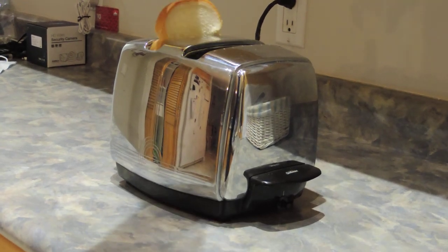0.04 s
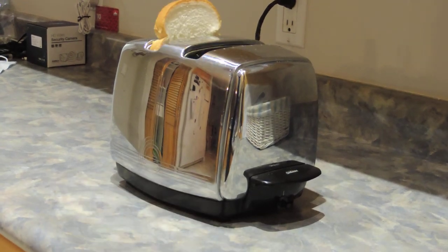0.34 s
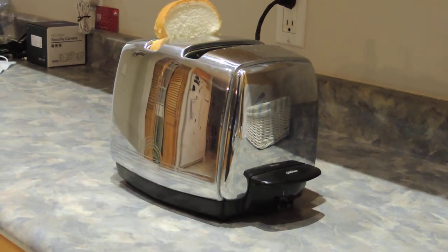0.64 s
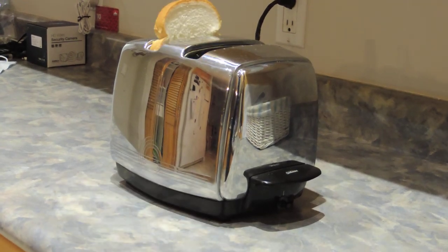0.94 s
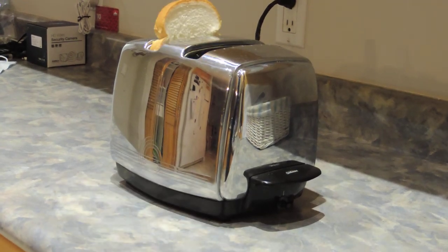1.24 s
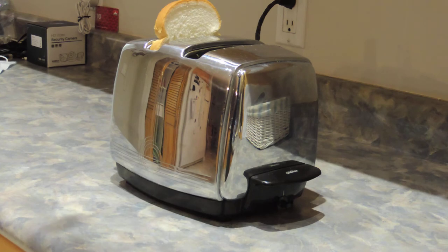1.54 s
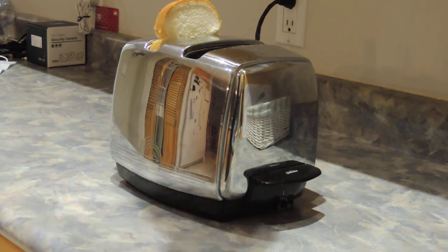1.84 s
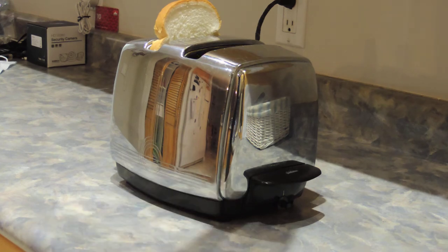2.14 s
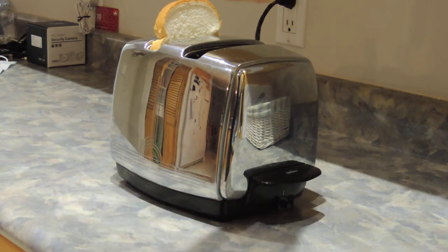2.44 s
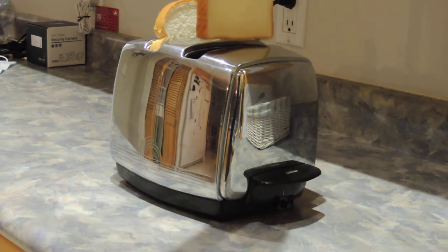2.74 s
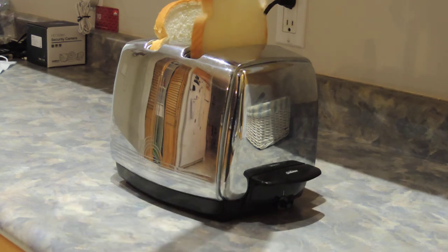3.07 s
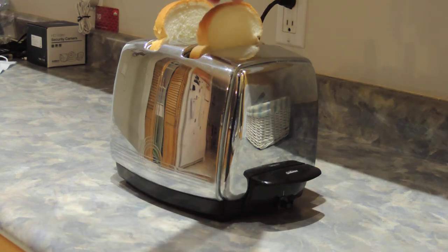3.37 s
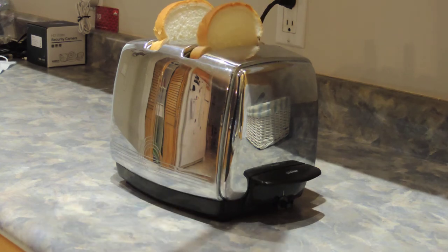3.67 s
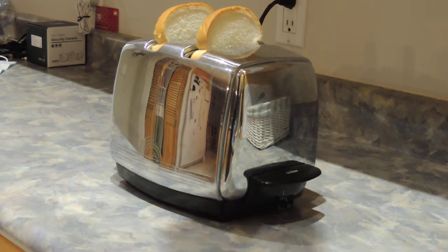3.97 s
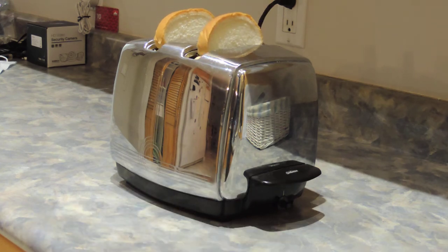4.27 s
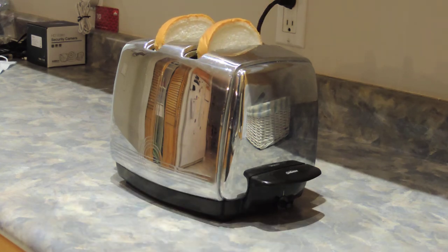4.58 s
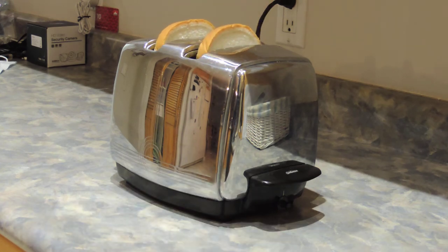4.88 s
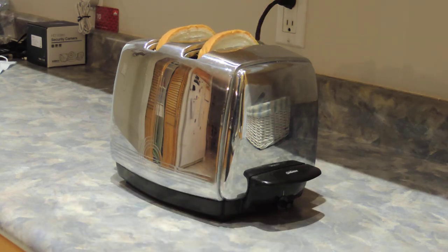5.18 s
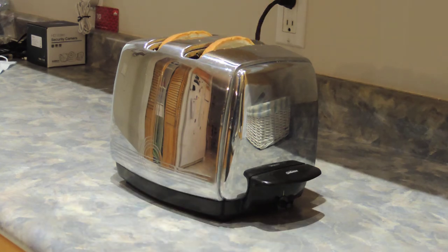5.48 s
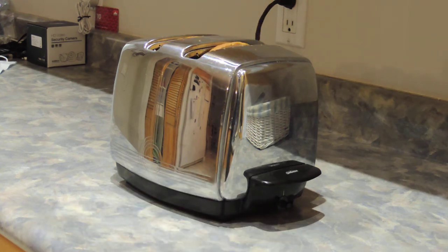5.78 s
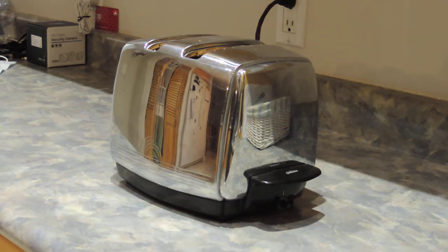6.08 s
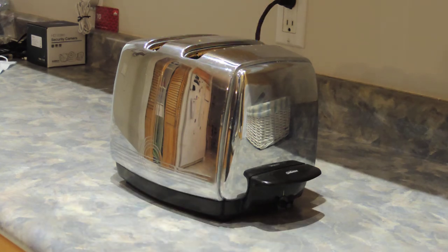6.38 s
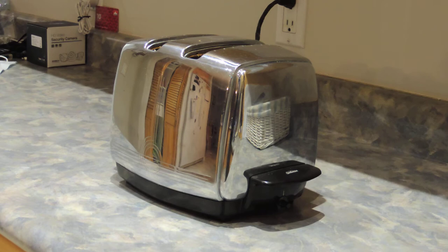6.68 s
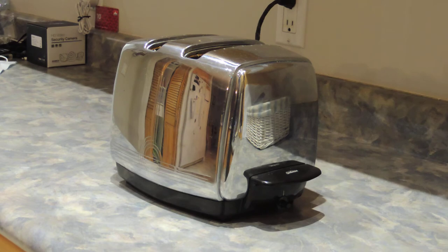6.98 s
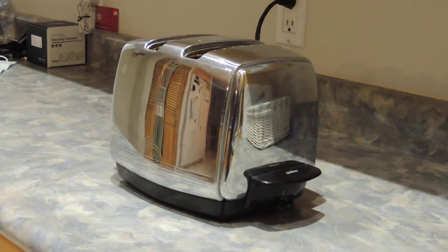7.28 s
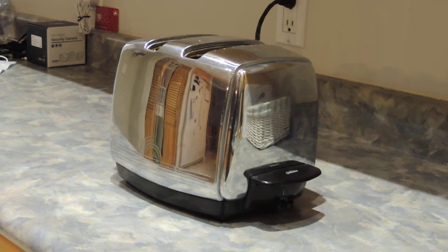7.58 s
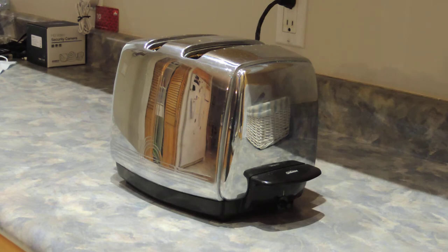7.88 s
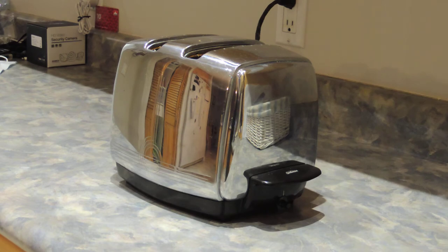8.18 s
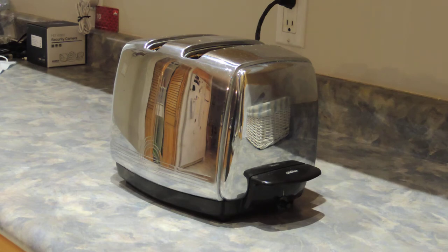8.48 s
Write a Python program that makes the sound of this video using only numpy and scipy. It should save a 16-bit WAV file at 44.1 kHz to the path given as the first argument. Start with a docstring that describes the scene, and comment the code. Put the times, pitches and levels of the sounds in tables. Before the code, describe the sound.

Over a low fridge hum, a steel toaster clatters as bread lands, then clacks and lowers the slices with faint scraping.

```python
"""In a small kitchen, bread drops into a steel toaster that lowers itself. It plucks the guide wires
and rattles the carriage, the rack that holds it; each knock makes the wires and the shell ring.
A catch clacks, then the slices sink, their crusts rubbing softly along the slots.
Behind it all are a refrigerator's throbbing hum and a faint hiss."""
import sys
import numpy as np
from scipy import signal
from scipy.fft import rfft, irfft, next_fast_len
from scipy.io import wavfile
from scipy.ndimage import map_coordinates

SR = 44100
rng = np.random.default_rng(int(sys.argv[2]) if len(sys.argv) > 2 else 0)


def master_out(mix):
    """Clip the mix to full scale and print it as 16-bit PCM to the path in sys.argv[1]."""
    frames = np.transpose(np.atleast_2d(mix))
    ceiling = np.clip(frames, -1, 1)
    pcm = np.round(ceiling * 32767).astype(np.int16)
    wavfile.write(sys.argv[1], SR, pcm)


N = 380141
TIME = np.arange(N) / SR
TAIL = np.arange(SR // 2) / SR  # the half second after a knock


def amp(db):
    """Turn decibels into a gain."""
    return 10 ** (np.asarray(db) / 20)


def unit(x):
    """Scale a signal to an average power of 1."""
    return x / np.sqrt(np.mean(x ** 2) + 1e-20)


def along(points, hz):
    """Read between (Hz, value) points on a logarithmic pitch scale."""
    pitches, values = np.transpose(points)
    return np.interp(np.log(hz + 1), np.log(pitches + 1), values)


def wobble(rate):
    """A smooth curve through `rate` random values a second."""
    return map_coordinates(rng.standard_normal(int(N * rate / SR) + 4), [TIME * rate])


def filtered(x, response):
    """Give each frequency in x the gain that response(hz) asks for."""
    length = x.shape[-1]
    padded = next_fast_len(length + 8192)
    hz = np.fft.rfftfreq(padded, 1 / SR)
    return irfft(rfft(x, padded) * response(hz), padded)[..., :length]


def resonances(peaks, hz):
    """The response of ringing peaks, each given as pitch in Hz, width in Hz, level in dB."""
    return sum(amp(db) * 1j * hz * width / (pitch ** 2 - hz ** 2 + 1j * hz * width)
               for pitch, width, db in peaks)


def noise(response, alike, size):
    """Shaped stereo noise; `alike` pairs Hz with how alike left and right are (1 is the same)."""
    def mid_and_side(hz):
        angle = np.arccos(np.clip(along(alike, hz), -1, 1)) / 2
        return response(hz) * np.array([np.cos(angle), np.sin(angle)])
    mid, side = filtered(rng.standard_normal((2, size)), mid_and_side)
    return unit(np.array([mid + side, mid - side]))


def add(track, start, sound):
    """Mix a short sound in at `start` seconds."""
    part = track[:, round(start * SR):][:, :len(TAIL)]
    part += sound[:, :part.shape[1]]


def refrigerator():
    """The compressor's turning shaft varies the mains buzz; tones close in pitch beat and throb."""
    # Each row: multiple of the mains buzz, multiple of the shaft speed, level in dB.
    compressor = [(0, 1, -38.5), (0, 2, -60), (1, 0, -55), (0, 3, -62.5), (1, 1, -59), (1, 2, -58.5),
                  (3, -3, -68), (0, 5, -68.5), (2, 0, -62), (1, 3, -67.5), (3, -2, -62), (0, 6, -63.5),
                  (2, 1, -57), (3, -1, -60), (0, 7, -58.5), (2, 2, -51), (3, 0, -63), (2, 3, -63),
                  (4, 0, -67.5), (3, 3, -64.5)]
    # Each row: pitch in Hz, level in dB.
    fan = [(58.9, -60.5), (588.8, -67.5), (714.8, -68)]
    shaft_hz, buzz_hz = 46.36, 120
    turns = shaft_hz * TIME + 0.02 * wobble(0.715)
    tones = [(buzz * buzz_hz * TIME + shaft * turns, db) for buzz, shaft, db in compressor]
    tones += [(hz * TIME + 0.12 * wobble(3), db) for hz, db in fan]
    hum = sum(amp(db + 0.33 * wobble(3.24)) * np.sin(2 * np.pi * (cycles + rng.random()))
              for cycles, db in tones)
    return hum * amp([[.1], [-.1]])  # left, right


def room_tone():
    """A low rush of air and a hiss with a few thin whines."""
    # Each row: frequency in Hz, relative level in dB.
    air_tone = [(10, 0.5), (28, -2), (70, -6.5), (110, -13), (150, -2.5), (190, -10), (300, -3),
                (420, -9.5), (600, -15.5), (1000, -17), (2200, -23.5), (4500, -24.5), (9000, -26.5),
                (14200, -28)]
    # The whines. Each row: pitch in Hz, width in Hz, relative level in dB.
    peaks = [(1904, 174, -1), (2765, 116, 0), (5480, 26, 2), (5790, 44, 2.5), (6360, 43, 2.5)]
    # Each row: frequency in Hz, how alike left and right are.
    alike = [(60, 0.77), (130, 0.89), (290, 0.97), (640, 0.56), (1400, 0.18), (3070, -0.089),
             (6750, -0.016), (14800, -0.026)]
    air = noise(lambda hz: amp(along(air_tone, hz)), alike, N)
    whine_tone = lambda hz: np.sqrt(sum(abs(resonances([peak], hz)) ** 2 for peak in peaks))
    return amp(-49) * air + amp(-63) * noise(whine_tone, alike, N)


def contacts():
    """List each blow and any bounces of the loose carriage: time, then click, clank and thud levels."""
    # Bread lands near 3.4 s, the catch lets go near 4.4 s, then the carriage knocks on its way down.
    # Each row: start in seconds, click, clank and thud levels in dB, seconds allowed for bouncing.
    blows = [(.002, -56, -60, -51, 0.0078), (.955, -54, -70, -63, 0.018), (3.200, -44.5, -53, -68, 0),
             (3.210, -44, -46.5, -55, 0.0024), (3.268, -45.5, -52, -50, 0),
             (3.406, -34.5, -37, -50, 0.0011), (3.412, -32, -35, -55, 0.0028),
             (3.429, -28.5, -33.5, -48, 0.00062), (3.440, -32, -31.5, -38.5, .2), (3.558, -44, -57, -63, 0),
             (3.809, -69, -51, -57, 0.011), (4.372, -35, -44, -44.5, 0), (4.376, -45, -42, -44, 0.065),
             (6.478, -48.5, -50.5, -51.5, 0.063), (7.080, -57, -53.5, -59, 0.015),
             (7.560, -54, -53, -56, 0.0049)]
    # Bounces start weaker than their blow: click, clank and thud in dB.
    bounce_db = [-8, -10.5, -2.5]
    # They grow softer and duller: click, clank and thud in dB per second.
    fade_rates = [-90, -63, -55]
    gap_s, unevenness = .0205, .15
    for start, *levels, rattle_s in blows:
        yield start, *levels
        for delay in np.arange(gap_s, rattle_s, gap_s):
            bounce = np.add(levels, bounce_db) + delay * np.array(fade_rates)
            yield start + delay + gap_s * unevenness * rng.standard_normal(), *bounce


def ripple(spacing_hz, depth_db):
    """Metal favours some pitches over others: random hills and valleys as (Hz, dB) points."""
    hz = np.arange(0, SR / 2, spacing_hz)
    return np.transpose([hz, depth_db * rng.standard_normal(len(hz))])


def ring(tones, scatter_db, waver_db):
    """Struck metal rings with a new balance of tones each time; loose parts make them waver."""
    hz, db, fade_s = np.transpose(tones)[:, :, None]
    jitter = rng.standard_normal((2, len(tones), len(TAIL)))
    phase_drift, level_drift = unit(filtered(jitter, lambda f: np.exp(-(f / 60) ** 2)))
    offset = rng.random(hz.shape) + .5 * rng.random((2,) + hz.shape)  # left and right get their own
    phase = 2 * np.pi * offset + 0.17 * waver_db * phase_drift
    levels = db + scatter_db * rng.standard_normal(hz.shape) + waver_db * level_drift
    strength = unit(amp(levels)) / np.sqrt(len(hz) / 2)
    waves = strength * amp(-60 * TAIL / fade_s) * np.sin(2 * np.pi * hz * TAIL + phase)
    return waves.sum(axis=1) * (1 - np.exp(-TAIL / 0.00069))


def burst(spectrum, body, attack_s, fade_s, room_db):
    """Sheet metal's crowded tones blur into noise and die fast; the kitchen's echo carries them on."""
    # The echo. Each row: frequency in Hz, seconds to fade by 60 dB.
    kitchen = [(200, 0.51), (900, 0.44), (2500, 0.41), (7000, 0.31), (14000, .22)]
    spot = ripple(spacing_hz=300, depth_db=2)  # each spot struck has its own tone
    colour = lambda hz: amp(along(spectrum, hz) + along(body, hz) + along(spot, hz))
    metal = noise(colour, alike=[(250, 1.0), (900, 0.89), (3000, 0.23), (9000, .1)], size=len(TAIL))
    hz, t, bands = signal.stft(metal, SR, nperseg=256)
    fading = bands * amp(-60 * t / along(kitchen, hz)[:, None])
    echo = signal.istft(fading, SR, nperseg=256)[1][:, :len(TAIL)]
    direct = metal * amp(-60 * TAIL / fade_s)
    return (direct + amp(room_db) * echo) * (1 - np.exp(-TAIL / attack_s))


def knocks(body):
    """Each contact clicks the wire rack, clanks the steel shell and thuds through the base."""
    # Each row: pitch in Hz, relative level in dB, seconds to fade by 60 dB.
    rack_tones = [(4640, 0, .27), (5480, -6, .3), (6470, -2, .25), (7230, 1, .28), (7888, -1, .28),
                  (8969, -3, .23), (9545, -6, .24), (10720, -5, .3), (11510, -3, .2)]
    shell_tones = [(716, -7, .6), (872, -6, .44), (1184, -5, .45), (2220, -1, .33), (2336, -5, .36),
                   (2513, -1, .37), (2552, -3, .37), (2832, 0, .38), (4942, -9, .4), (5566, -9, .4)]
    # Each row: frequency in Hz, relative level in dB.
    click_noise = [(1500, -34), (3900, -7.5), (4700, -1), (6800, 1), (9000, -1.5), (12000, -0.5),
                   (14200, -7.5)]
    clank_noise = [(700, -15), (1500, -9), (2000, 0), (2400, 1.5), (3100, -2.5), (3700, -8.5), (4700, -8.5),
                   (7000, -24), (14000, -40)]
    thud_noise = [(100, -25), (260, 3.5), (450, -5), (640, 1.5), (850, 0), (980, -1.5), (1200, 2.5),
                  (1600, -2), (3000, -15), (9000, -50)]
    out = np.zeros((2, N))
    for start, click_db, clank_db, thud_db in contacts():
        rack = amp(-12) * ring(rack_tones, scatter_db=2.5, waver_db=2.5)
        shell = amp(-7) * ring(shell_tones, scatter_db=2, waver_db=1.2)
        click = burst(click_noise, body, attack_s=0.0014, fade_s=0.057, room_db=-5.5) + rack
        clank = burst(clank_noise, body, attack_s=0.0031, fade_s=0.053, room_db=-9.5) + shell
        thud = burst(thud_noise, body, attack_s=0.0054, fade_s=0.043, room_db=-2.5)
        add(out, start, amp(click_db) * click + amp(clank_db) * clank + amp(thud_db) * thud)
    return out


def stroke(start, length, attack_s, fade_db_per_s):
    """The loudness of one rub: it builds up, holds, then dies away."""
    t = TIME - start
    return np.clip(t / attack_s, 0, 1) * amp(-fade_db_per_s * np.maximum(t - length, 0))


def bread_rubbing():
    """Bread slides in the slots with a soft hiss; its crust catches on the wires in many tiny slips."""
    # Each row: start and length in seconds, level in dB.
    slides = [(.3, .25, -60.5), (4.4, 0.97, -61.5), (5.3, 1.7, -58), (7.6, 0.24, -60.5)]
    # Each row: start and length in seconds, level in dB, amount of wire ring against crust noise.
    scrapes = [(5.37, .05, -50.5, 1), (5.475, 0.13, -52, .95), (5.667, .16, -54.5, .45),
               (6.03, .07, -56.5, .6), (6.21, 0.078, -52.5, 0.63), (6.47, .06, -51.5, .1),
               (6.856, .055, -50, .1), (7.06, 0.042, -59, .1), (7.22, .06, -62, .1), (8.062, .09, -50, .2)]
    # Each row: frequency in Hz, relative level in dB.
    slide_tone = [(500, -7), (1500, -2.5), (4000, -5), (8000, -1.5), (14000, -5.5)]
    crust_tone = [(1500, -24), (3500, -5), (6000, -3.5), (8000, -1), (12500, -4.5), (14200, -2)]
    # Rubbed wires ring. Each row: pitch in Hz, width in Hz, relative level in dB.
    wire_peaks = [(8550, 320, 7.5), (11100, 1200, 5)]
    alike = [(500, 0.55), (8000, 0.088)]
    slips = unit(amp(1.2 * wobble(400) + 1.2 * wobble(40)))
    crust = noise(lambda hz: amp(along(crust_tone, hz)), alike, N)
    wires = noise(lambda hz: resonances(wire_peaks, hz), alike, N)
    hiss = noise(lambda hz: amp(along(slide_tone, hz)), alike, N)
    scraping = np.zeros((2, N))
    for start, length, db, ringing in scrapes:
        blend = (crust + ringing * wires) / np.sqrt(1 + ringing ** 2)
        scraping += amp(db) * stroke(start, length, attack_s=.02, fade_db_per_s=125) * blend
    sliding = np.max([amp(db) * stroke(start, length, attack_s=0.1, fade_db_per_s=30)
                      for start, length, db in slides], axis=0)
    return slips * scraping + sliding * amp(1.3 * wobble(7.3)) * hiss


def wire_plucks():
    """Falling bread plucks a guide wire, which at once catches on the crust again, more softly."""
    # Each row: start in seconds, level in dB.
    plucks = [(3.200, -40.5), (3.247, -53), (3.297, -47)]
    # Each row: pitch in Hz, relative level in dB, seconds to fade by 60 dB.
    wire_tones = [(7640, -3, .09), (7860, -3, 0.2), (10300, -16, .22)]
    out = np.zeros((2, N))
    for start, db in plucks:
        for delay_s, softer_db in [(0, 0), (.0075, -3.5)]:
            add(out, start + delay_s, amp(db + softer_db) * ring(wire_tones, scatter_db=2, waver_db=2.5))
    return out


def latch_spring():
    """The carriage catches and its spring sings."""
    # Each row: start in seconds, level in dB.
    latches = [(4.376, -43.5), (6.480, -55.5)]
    # Each row: pitch in Hz, relative level in dB, seconds to fade by 60 dB.
    spring_tones = [(1025, -4, 0.59), (1180, 5, .55), (1290, -9, .45), (2400, -9, .3), (3700, 5, 0.19)]
    out = np.zeros((2, N))
    for start, db in latches:
        add(out, start, amp(db) * ring(spring_tones, scatter_db=5, waver_db=4.0))
    return out


def carriage_taps(body):
    """Two dry taps as the carriage starts to sink."""
    # Each row: start in seconds, level in dB.
    taps = [(5.343, -43), (5.412, -46.5)]
    # Each row: frequency in Hz, relative level in dB.
    tap_noise = [(400, -22), (800, 0), (1200, -2), (2000, -3), (2500, -8), (3500, -25), (8000, -45)]
    out = np.zeros((2, N))
    for start, db in taps:
        add(out, start, amp(db) * burst(tap_noise, body, attack_s=0.00051, fade_s=0.027, room_db=-12))
    return out


def scene():
    """The toaster, a little to the right, in the humming kitchen."""
    body = ripple(spacing_hz=22, depth_db=2.2)  # one metal body colours all knocks and taps
    toaster = knocks(body) + wire_plucks() + latch_spring() + carriage_taps(body)
    return toaster * amp([[-.6], [.6]]) + bread_rubbing() + refrigerator() + room_tone()


def record(dry):
    """Cut away the very highest treble."""
    return filtered(dry, lambda hz: hz < 14250)


dry = scene()
out = record(dry)
master_out(out)
```